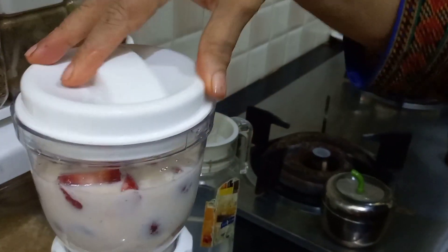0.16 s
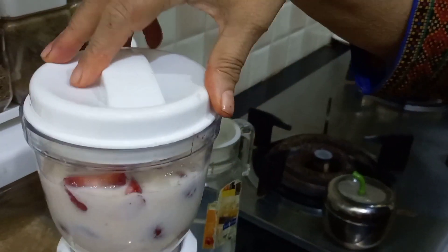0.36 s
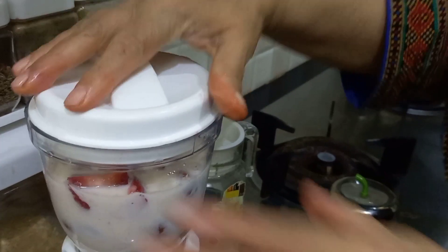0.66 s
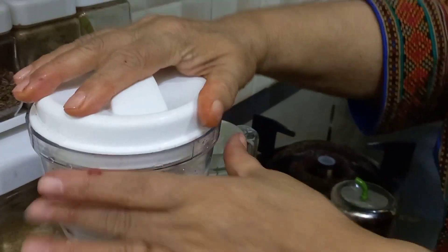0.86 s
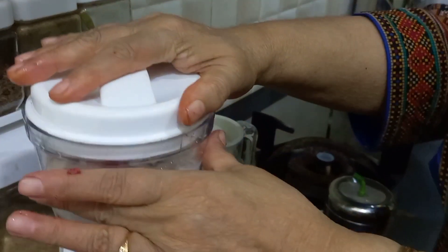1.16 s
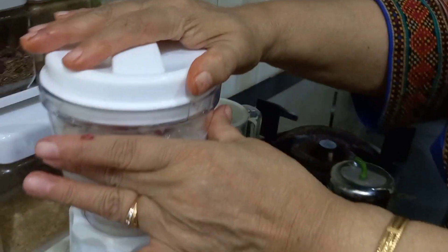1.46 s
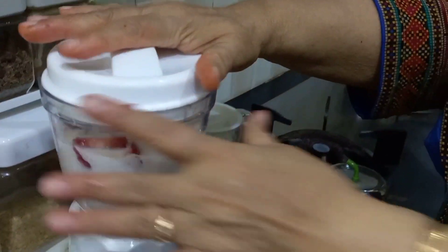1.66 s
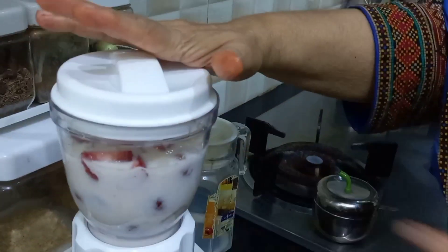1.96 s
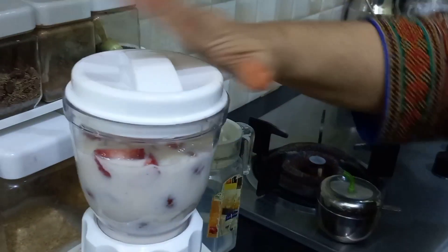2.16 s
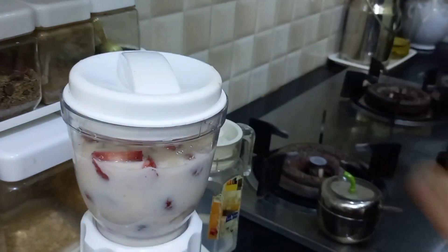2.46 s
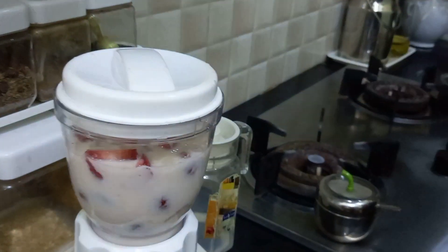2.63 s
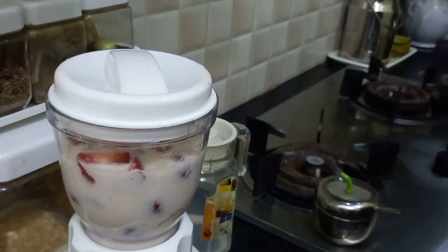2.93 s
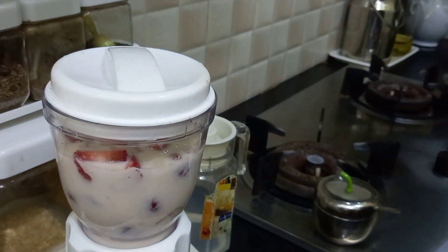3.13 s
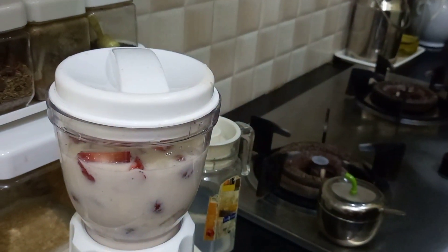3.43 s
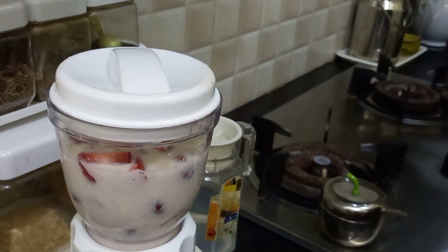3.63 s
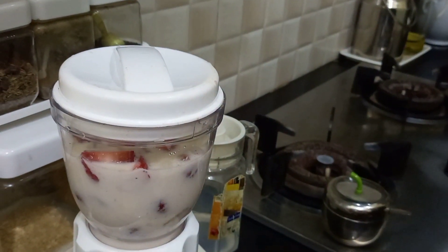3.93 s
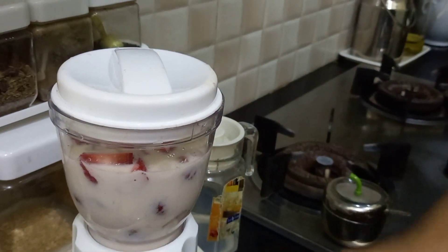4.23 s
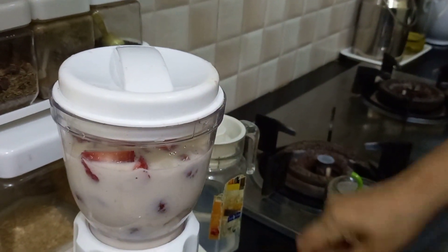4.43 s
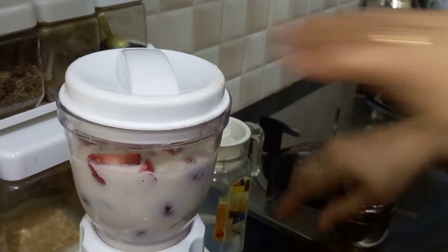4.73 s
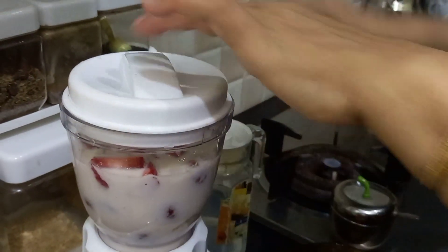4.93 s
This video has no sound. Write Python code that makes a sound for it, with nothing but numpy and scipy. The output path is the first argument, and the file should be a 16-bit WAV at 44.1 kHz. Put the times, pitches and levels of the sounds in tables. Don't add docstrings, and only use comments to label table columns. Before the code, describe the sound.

Hollow plastic knocks and sharp ticks, a quiet pause with rustling cloth, then something knocked loose, scraped across the counter and slammed down.

```python
import sys
import numpy as np
from scipy import signal
from scipy.fft import rfft, irfft, next_fast_len
from scipy.io import wavfile
from scipy.ndimage import uniform_filter1d

SR = 44100
rng = np.random.default_rng(int(sys.argv[2]) if len(sys.argv) > 2 else 0)


def wrap_up_sound(samples):
    columns = np.atleast_2d(samples).T
    tamed = np.clip(columns, -1, 1)
    steps = np.round(tamed * 32767).astype(np.int16)
    wavfile.write(sys.argv[1], SR, steps)


def ratio(d):
    e = np.asarray(d, float) / 20
    return 10 ** e


N = 224198


def read(points, hz):
    f, value = np.transpose(points)
    return np.interp(np.log(hz + 1), np.log(f + 1), value)


def evened(x):
    return x / np.sqrt(np.mean(x ** 2) + 1e-20)


def add(mix, s, sound):
    part = mix[round(s * SR):][:len(sound)]
    part += sound[:len(part)]


def coloured(x, points):
    n = x.shape[-1]
    size = next_fast_len(n)
    gain = ratio(read(points, np.fft.rfftfreq(size, 1 / SR)))
    return irfft(rfft(x, size) * gain, size)[..., :n]


def high_pass(x, hz):
    return signal.sosfilt(signal.butter(4, hz, "high", fs=SR, output="sos"), x)


def resonate(x, hz, width_hz):
    return signal.lfilter(*signal.iirpeak(hz, hz / max(width_hz, 1), SR), x)


def resonate_twice(x, hz, width_hz):
    return resonate(resonate(x, hz, width_hz), hz, width_hz)


# hz, likeness
SAME = [(60, -0.11), (130, 0.71), (290, 0.4), (640, 0.81), (1410, -0.055), (3100, -0.33), (6820, 0.66),
        (15000, 0.29)]


def pair(a, b, likeness=SAME):
    size = next_fast_len(len(a))
    same = np.clip(read(likeness, np.fft.rfftfreq(size, 1 / SR)), -1, 1)
    right = same * rfft(a, size) + np.sqrt(1 - same ** 2) * rfft(b, size)
    return np.array([a, irfft(right, size)[:len(a)]])


def ring(modes, luck, spread_db=4, detune=.021):
    t = np.arange(8000) / SR
    return sum(ratio(db + spread_db * k - 60 * t / t60) * np.sin(2 * np.pi * hz * (1 + detune * k) * t)
               for (hz, db, t60), k in zip(modes, luck))


def crack(noise, colour, tilt, t60):
    n = len(noise)
    hz = abs(np.fft.fftfreq(n, 1 / SR))
    burst = np.fft.fft(noise * ratio(-60 * np.arange(n) / SR / t60))
    size = abs(burst)
    log_gain = np.log(ratio(read(colour, hz) + read(tilt, hz)) / (size + 0.085 * size.mean()))
    sound = np.fft.ifft(burst * np.exp(np.conj(signal.hilbert(log_gain)))).real
    return sound / abs(sound).max() * np.hanning(2 * n)[n:]


ONSET_DB = 17.5


def strokes(rows, fall_db_per_s, axis=3):
    t, gain = np.arange(N) / SR, np.zeros(N)
    for row in rows:
        u, rise, hold = t - row[0], max(row[1], 1 / SR), row[2]
        climb_db = np.minimum(ONSET_DB * (u / rise - 1), 0)
        fall_db = fall_db_per_s * np.maximum(u - rise - hold, 0)
        gain += ratio(row[axis] + np.maximum(climb_db - fall_db, -200)) * (u > 0)
    return uniform_filter1d(gain, size=120)


def bursts(rows):
    out = np.zeros(N)
    t = np.arange(4000) / SR
    for s, db, hz, swell, t60 in rows:
        rise = np.sin(np.pi / 2 * np.minimum(t / swell, 1)) ** 2
        fall = ratio(db - 60 * np.maximum(t - swell, 0) / t60)
        add(out, s - swell, rise * fall * np.sin(2 * np.pi * hz * (t - swell)))
    return out


def friction(gain, colour, flicker_db):
    flicker = evened(uniform_filter1d(rng.standard_normal(N), size=500))
    noise = evened(coloured(pair(*rng.standard_normal((2, N))), colour))
    return gain * ratio(flicker_db * flicker) * noise


# hz, t60_s
KITCHEN = [(150, 0.36), (400, 0.3), (1040, 0.27), (2760, 0.32), (7280, 0.33), (15000, 0.085)]
# hz, level_db
WALLS = [(100, -1), (1000, 5), (4000, 0.5), (7000, -7), (12000, -13.5), (16000, -22.5)]
# hz, likeness
TAIL_SAME = [(60, 0.48), (200, 0.93), (500, 0.63), (1400, -0.077), (3100, -0.36), (6800, 0.22), (15000, 1)]


def kitchen(x, wet_db, gap_s=0.0013):
    taps = rng.standard_normal((2, SR // 2)) * (rng.random((2, SR // 2)) < .1)
    hz, t, z = signal.stft(pair(*taps, TAIL_SAME), SR, nperseg=256)
    decay_db = read(WALLS, hz)[:, None] - 60 * t / read(KITCHEN, hz)[:, None]
    tail = signal.istft(z * ratio(decay_db), SR, nperseg=256)[1]
    tail = tail * np.minimum(np.arange(tail.shape[1]) / SR / gap_s, 1)
    tail = tail / np.linalg.norm(tail[0]) / 2
    x = x * np.ones((2, 1))
    return x + ratio(wet_db) * signal.fftconvolve(x, tail, axes=1)[:, :N]


# hz, level_db_per_hz
HISS = [(24, -31.5), (40, 11), (429, -9), (978, -15.5), (1170, -22.5), (1500, -18), (1740, -19.5),
        (2120, -21.5), (2790, -22.5), (3590, -23), (5210, -22), (5910, -33), (6530, -29), (7400, -32.5),
        (15600, -28)]
HISS_DB = -61


def room_hiss():
    noise = coloured(pair(*rng.standard_normal((2, N))), HISS)
    z = signal.stft(noise, nperseg=1024)[2]
    patches = uniform_filter1d(rng.standard_normal(z.shape[1:]), size=12, axis=0)
    patches = evened(uniform_filter1d(patches, size=8, axis=1))
    return ratio(HISS_DB) * evened(signal.istft(z * ratio(1.5 * patches), nperseg=1024)[1][:, :N])


# hz, level_db_rms
HUM = [(48.4, -76.5), (193.8, -68.5), (242.2, -68), (344.5, -73.5), (393.0, -70), (441.4, -72),
       (635.2, -106.5), (683.7, -79), (780.6, -86)]


def fridge_hum():
    t = np.arange(N) / SR
    waver = uniform_filter1d(rng.standard_normal((len(HUM), N)), size=5000)
    return sum(ratio(db - 2.0 + 3.3 * evened(w)) * np.sin(2 * np.pi * hz * t + 0.22 * evened(w[::-1]))
               for (hz, db), w in zip(HUM, waver))


# hz, width_hz, level_db_rms
WHINE = [(2720, 140, -81), (6600, 220, -85)]


def vent_whine():
    noise = rng.standard_normal((2, N))
    return sum(ratio(db) * evened(resonate_twice(noise, hz, w)) for hz, w, db in WHINE)


# start_s, rise_s, hold_s, dull_db, fine_db
SLEEVES = [(.001, 0.022, 0.042, -66.5, -88), (.28, 0.071, .13, -69, -70.5),
           (.58, 0.069, 0.14, -66.5, -68.5), (1.49, 0.088, 0.1, -69, -88), (1.64, 0.13, .55, -72, -70.5),
           (2.3, 0.074, 0.19, -73, -69.5), (2.6, 0.092, 0.24, -75.5, -77), (3.14, .12, 0.1, -64.5, -69.5),
           (3.42, .1, 0.062, -67.5, -67), (3.55, 0.08, .35, -78, -76.5), (4.7, 0.031, 0.26, -67.5, -74)]
SLEEVE_FALL_DB_PER_S = 139.5
# hz, level_db_per_hz
RUSTLE_COLOUR = [(2000, -4.5), (3200, -0.5), (5000, 0), (6500, -4.5), (8800, -0.5), (10500, -18.5),
                 (12500, -34)]
# hz, level_db_per_hz
SILK_COLOUR = [(8000, -9.5), (11000, -4), (12500, -2), (14000, 2.5), (15500, -2), (16500, -26.5)]


def sleeves():
    dull = friction(strokes(SLEEVES, SLEEVE_FALL_DB_PER_S), RUSTLE_COLOUR, 0.76)
    return dull + friction(strokes(SLEEVES, SLEEVE_FALL_DB_PER_S, axis=4), SILK_COLOUR, 1.2)


# start_s, rise_s, hold_s, level_db
SHUFFLE = [
    (.006, 0.046, .002, -39),
    (.125, 0.042, 0.0022, -25.5),
    (.17, 0.042, 0.0022, -34),
    (2.151, 0.0025, 0.039, -32),
]
SHUFFLE_FALL_DB_PER_S = 748
# hz, level_db, t60_s
LID = [(219, -39.5, 0.024), (244.4, -3.5, 0.078), (345, -12.5, 0.084), (410, -6.5, 0.12), (530, -34, 0.018),
       (700, 5, 0.0099), (820, -11, 0.069), (964, -36, 0.02), (1160, -18, 0.035), (1400, -49.5, 0.014),
       (1920, -3, 0.01107)]


def shuffle():
    contacts = rng.standard_normal(N) * (rng.random(N) < 600 / SR)
    modes = sum(ratio(db) * evened(resonate_twice(contacts, hz, 6.2 / t60)) for hz, db, t60 in LID)
    return strokes(SHUFFLE, SHUFFLE_FALL_DB_PER_S) * ratio(-13) * evened(modes)


# start_s, peak_db, strongest_hz, brightness_db
KNOCKS = [(.010, -36.5, 399, -3), (.026, -33, 700, -3), (0.04, -29.5, 795, -6), (0.053, -34, 396, -1),
          (.100, -42.5, 700, -8), (.124, -35, 700, 12), (.139, -26, 723, -3), (.153, -29.5, 624, -8),
          (.185, -20, 820, -4), (0.195, -25, 820, 5), (0.202, -15.5, 335, -1.5), (0.207, -30, 345, -20),
          (0.242, -54, 700, 2), (0.474, -44, 377, 1), (0.486, -36.5, 410, -4), (0.51, -34.5, 430, 0),
          (.641, -27, 392, -2), (.663, -34.5, 454, -13), (.672, -38.5, 700, 16), (.915, -48, 418, -3),
          (1.37, -49, 425, -12), (1.808, -53, 980, -16), (2.154, -27.5, 914, 17), (2.163, -26.5, 385, -11),
          (2.184, -25, 496, -17), (5.014, -47, 430, -5), (5.032, -38.5, 423, -8), (2.865, -48, 1175, 1),
          (2.889, -53, 1150, 1)]


def knocks():
    out = np.zeros(N)
    for (s, db, hz, bright_db), luck in zip(KNOCKS, rng.standard_normal((len(KNOCKS), 12))):
        modes = [(f, d + bright_db * (f > 600), t60) for f, d, t60 in LID] + [(hz, 4, .05)]
        sound = signal.convolve(ring(modes, luck), np.hanning(36))
        add(out, s, ratio(db) * sound / abs(sound).max())
    return high_pass(out, 167)


# start_s, peak_db, brightness_db, ring_hz
TICKS = [(0.0267, -46, 6.5, 2120), (0.127, -30, 0.5, 2700), (0.1826, -32, 1.5, 2150),
         (0.2397, -30.5, -0.5, 2700), (0.3982, -51, -4, 2730), (0.4866, -32, -23.5, 2650),
         (0.6429, -60, -5.5, 2300), (0.9099, -36, -1, 2710), (0.9498, -39.5, -10.5, 2720),
         (1.297, -57.5, -7, 2720), (1.3671, -33, -3.5, 2810), (1.8065, -36, -5.5, 3180),
         (2.1194, -54.5, -8.5, 2780), (2.153, -41, -42, 1900), (2.2354, -33.5, -7.5, 2710),
         (2.8097, -58.5, -24, 2770), (4.008, -66.5, 8, 1800), (5.022, -45.5, -19, 3100)]
# hz, level_db_per_hz
TICK_COLOUR = [(300, -30), (600, -29), (1200, -2.5), (1700, -11), (2200, 0.5), (3200, -8.5), (4000, -11.5),
               (5200, -15.5), (9400, -26.5), (15600, -30)]
# fullness_db, left_right_db
LID_TICK = (12, 18)
RIM_TICK = (-4.8, -2.2)
RIM_ABOVE_HZ = 2450


def ticks():
    out = np.zeros((N, 2))
    for (s, db, bright_db, hz), noise in zip(TICKS, rng.standard_normal((len(TICKS), 8000))):
        full_db, pan_db = RIM_TICK if hz > RIM_ABOVE_HZ else LID_TICK
        tilt = [(1300, full_db), (0.907 * hz, 0), (hz, 11), (1.135 * hz, 0), (4700, 0), (6000, bright_db + 11)]
        sound = crack(noise, TICK_COLOUR, tilt, 0.0057)
        add(out, s - .0008, np.outer(sound, ratio(db - 3.0 + pan_db * np.array([.5, -.5]))))
    return out.T


# peak_s, peak_db, pitch_hz, swell_s, t60_s
PATS = [(.0405, -28.5, 724, .009, 0.014), (0.044, -40.5, 1250, .004, 0.0082),
        (.156, -27, 800, 0.002, 0.031), (0.23, -23, 830, .002, 0.018), (.2005, -13, 740, 0.0033, 0.0083),
        (.199, -32, 1300, .003, 0.018), (0.52, -37.5, 630, 0.0013, 0.014), (.673, -30, 640, .001, 0.022),
        (2.156, -37, 1300, .001, .05), (2.166, -42, 1400, .002, .05), (.912, -60.5, 1170, 0.0015, 0.23),
        (1, -57, 960, 0.0024, 0.085), (4.5, -38.5, 330, 0.0035, 0.053), (5.022, -53, 956, 0.0028, 0.038)]


def pats():
    return bursts(PATS)


# start_s, rise_s, hold_s, level_db
RUB = [
    (.118, 0.012, 0.037, -53.5),
    (.178, 0.0039, 0.00087, -42),
    (.468, 0.0018, .002, -63.5),
    (.478, 0.0081, .001, -47.5),
    (.925, .04, .18, -55.5),
]
RUB_FALL_DB_PER_S = 218
# hz, level_db_per_hz
RUB_COLOUR = [(530, -47.5), (900, -28), (1130, -4), (1400, -29), (1540, -6), (2290, -3), (2670, -2),
              (4410, 0), (5340, -7.5), (5950, -5.5), (15600, -9)]


def palm_rub():
    return friction(strokes(RUB, RUB_FALL_DB_PER_S), RUB_COLOUR, 0.86)


# time_s, pressure_db
DRAG = [(3.997, -70), (3.999, -46.5), (4.035, -46), (4.12, -33), (4.2, -39), (4.28, -34), (4.323, -41.5),
        (4.328, -34.5), (4.535, -34)]


def pressure():
    db = np.interp(np.arange(N) / SR, *np.transpose(DRAG), left=-200, right=-200)
    return uniform_filter1d(ratio(db), size=120)


# start_s, rise_s, hold_s, level_db
NUDGES = [
    (2.805, 0.012, 0.0068, -62.5),
    (2.85, 0.024, 0.036, -59.5),
]
NUDGE_FALL_DB_PER_S = 551
# hz, width_hz, level_db
DRAG_MODES = [(829, 48, -7.5), (1020, 27, 2.5), (1197, 37, -1.5), (1306, 41, 2.5), (1410, 43, 2.5),
              (1568, 22, 0.5), (1900, 60, -9), (2076, 32, -6), (2294, 22, -24.5), (2747, 29, -22),
              (3986, 40, -22.5), (4660, 47, -33), (7040, 56, -41)]
# hz, level_db, t60_s
COUNTER = [(152.3, -12.5, 0.062), (248, -1.5, 0.11), (298, -0.5, 0.19), (344, -3.5, 0.11),
           (430, -0.5, 0.061), (545, -8, 0.042), (700, -6, 0.14)]


def drag():
    slips = rng.standard_normal(N) * (rng.random(N) < 4000 / SR) * ratio(0.5 * rng.exponential(1, N))
    grip = uniform_filter1d(rng.standard_normal((len(DRAG_MODES), N)), size=1500)
    modes = sum(ratio(db + 2.7 * evened(g)) * evened(resonate_twice(slips, hz, 1.8 * w))
                for (hz, w, db), g in zip(DRAG_MODES, grip))
    hollow = high_pass(resonate_twice(slips, 1150, 890), 740)
    rumble = sum(ratio(db) * evened(resonate_twice(slips, hz, 81)) for hz, db, t60 in COUNTER)
    t = np.arange(N) / SR
    tonal = np.interp(t, [4.322, 4.329, 4.44, 4.49, 4.53], [0.3, 0.71, 0.98, 1.4, 0.62])
    pressed = ratio(np.interp(t, [4.03, 4.1, 4.3, 4.5], [-7.5, -7.0, -25.5, -38.5]))
    slide = tonal * evened(modes) + 0.37 * evened(hollow) + pressed * evened(rumble)
    return (pressure() + strokes(NUDGES, NUDGE_FALL_DB_PER_S)) * ratio(-3.0) * slide


# start_s, peak_db, hardness_db, thud_db, ring_db
BANGS = [
    (4.0386, 3.5, 7.5, -29, -20),
    (4.0493, -5.5, 5.5, -9.5, -21.5),
    (4.533, -10.5, -11, -33, -15.5),
    (4.5406, -19.5, -12.5, -24, -3.5),
    (4.5466, 7, 2, -37, -9),
    (4.5518, -10.5, 4, -6.5, -18.5),
    (4.563, -1.5, -6, -9, -2.5),
]
BANG_PAN_DB = 0.85
# hz, level_db_per_hz
BANG_COLOUR = [(88, -36), (150, -28), (274, -8), (501, -6), (574, -19), (989, 3.5), (1610, 4.5),
               (2240, 0.5), (2720, -1), (6040, -13.5), (7330, -31), (13700, -25), (15600, -34)]
# hz, level_db_per_hz
SLAM_COLOUR = [(88, -42.5), (150, -20), (254, -18.5), (608, -32), (697, -10.5), (1460, 4), (1670, -9),
               (2940, -8), (4420, -8.5), (7190, -28.5), (7920, -54), (8730, -26.5), (15600, -35)]
# hz, level_db, t60_s
BODY = [(1050, -6.5, 0.054), (1197, -5, 0.1), (1450, -7, 0.022), (1503, -9, 0.089), (1807, -10.5, 0.18),
        (2120, 1.5, 0.025), (2435, -9.5, 0.21), (2680, -2, 0.049), (3404, -11.5, .04), (4200, -6.5, 0.0464)]
# (hz, level_db, t60_s)
PING = (4.5468, [(9430, -13, 0.013), (9300, -41.5, 0.1)])


def bangs():
    out = np.zeros((N, 2))
    for (s, db, hard_db, thud_db, ring_db), noise in zip(BANGS, rng.standard_normal((len(BANGS), 8000))):
        tilt = [(1500, 0.0055), (3500, hard_db), (9000, 0.97 * hard_db + 2.5)]
        body = signal.convolve(ring(BODY, noise, 1.7, detune=.003), np.hanning(9))[:8000] / 4
        thud = high_pass(ring(COUNTER, noise[::-1], 1.2), 150)
        hit = crack(noise, BANG_COLOUR if s < 4.3 else SLAM_COLOUR, tilt, 0.018)
        sound = hit + ratio(ring_db - 9.0) * body + ratio(thud_db - 15.5) * thud
        add(out, s, np.outer(sound, ratio(db - 5.0 + BANG_PAN_DB * np.array([.5, -.5]))))
    ping_s, ping_modes = PING
    add(out, ping_s, np.outer(ring(ping_modes, [0, 0]), ratio([3, -3])))
    return out.T


# peak_s, peak_db, pitch_hz, swell_s, t60_s
CLUNKS = [
    (4.5332, -9, 1325, 0.00071, .022),
    (4.5335, -23.5, 2910, 0.0009, .012),
    (4.5405, -12.5, 1300, .0015, 0.0091),
    (4.5482, -2, 1450, .004, .014),
    (4.551, -8.5, 2185, 0.0022, 0.024),
    (4.5652, -4, 1400, 0.0046, 0.013),
    (4.0405, -14.5, 3704, 0.0012, 0.016),
    (4.051, -15, 2694, 0.001, 0.019),
    (4.329, -30.5, 1370, 0.00092, 0.051),
]


def clunks():
    return bursts(CLUNKS)


# start_s, rise_s, hold_s, level_db
GRIT = [
    (4.043, 0.0022, 0.00092, -38.5),
    (4.548, 0.0022, .001, -28),
]
GRIT_FALL_DB_PER_S, GRIT_UNDER_DRAG_DB = 218.5, -20.5
# hz, level_db_per_hz
DRAG_GRIT = [(1470, -41), (2500, -7.5), (2780, 2.5), (3120, -28.5), (4580, -24.5), (4990, -0.5),
             (5510, -31), (6520, -13), (7780, -17.5), (11300, -13.5), (12100, -5.5), (13000, -10),
             (14300, -6), (15600, -25)]


def grit():
    gain = strokes(GRIT, GRIT_FALL_DB_PER_S) + ratio(GRIT_UNDER_DRAG_DB) * pressure()
    return friction(gain, DRAG_GRIT, 2.1)


# start_s, rise_s, hold_s, level_db
DUST = [
    (4.3, .12, .11, -57.5),
]
DUST_FALL_DB_PER_S = 301.5


def dust():
    return friction(strokes(DUST, DUST_FALL_DB_PER_S), SILK_COLOUR, 1.5)


def scene():
    hollow, clunk = pats(), clunks()
    hands = kitchen(ticks(), 10.3) + 0.53 * hollow
    hands += kitchen(knocks() + shuffle() + ratio(-14.5) * hollow, 1.4)
    struck = bangs() + ratio(-12) * clunk
    struck[0] = np.roll(struck[0], shift=11)
    counter = kitchen(struck, 6.96) + np.array([np.roll(clunk, shift=7), clunk])
    counter += kitchen(drag(), 4.9) + grit() + dust()
    room = room_hiss() + fridge_hum() + vent_whine()
    return hands + counter + palm_rub() + sleeves() + room


def roll_off(x):
    return signal.sosfilt(signal.butter(12, 15800, fs=SR, output="sos"), x)


# hz, left_right_db
LEAN = [(60, -0.5), (130, 1.5), (290, -3), (640, 0.0), (1410, -1), (3100, -11.5), (6820, 0), (15000, -6)]
# hz, width_hz, level_db
PORTS = [(2720, 150, -15), (6426, 920, 2.5)]


def record(dry):
    ears = [coloured(ear, [(hz, side * db) for hz, db in LEAN]) for ear, side in zip(dry, (.5, -.5))]
    wet = high_pass(ears, 50)
    wet[1] += sum(ratio(db) * resonate(wet[1], hz, w) for hz, w, db in PORTS)
    return roll_off(np.clip(wet, -1, 1))


dry = scene()
out = record(dry)
wrap_up_sound(out)
```